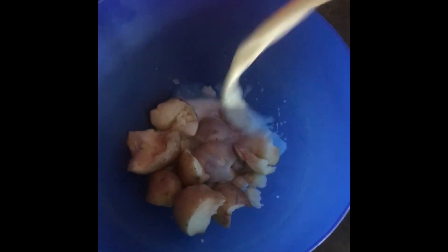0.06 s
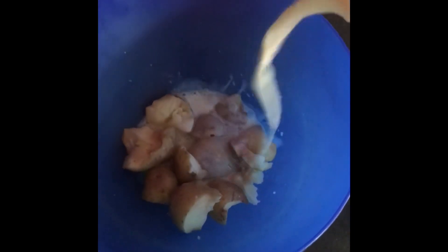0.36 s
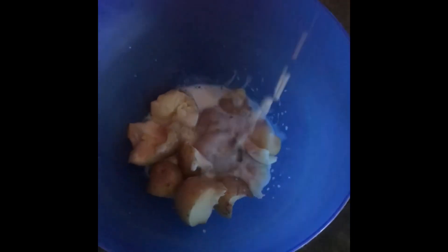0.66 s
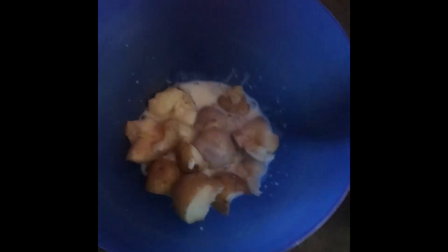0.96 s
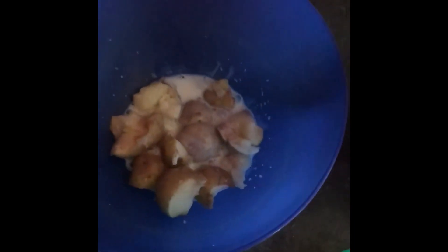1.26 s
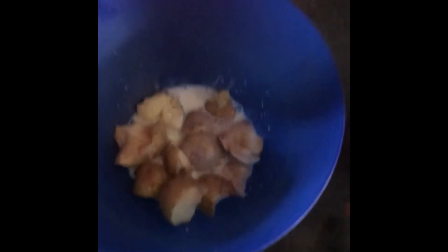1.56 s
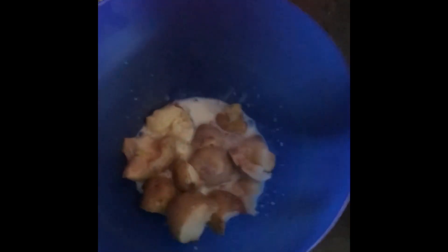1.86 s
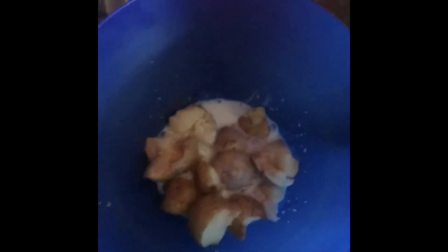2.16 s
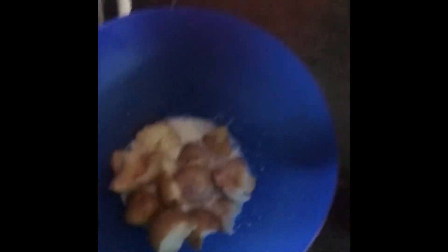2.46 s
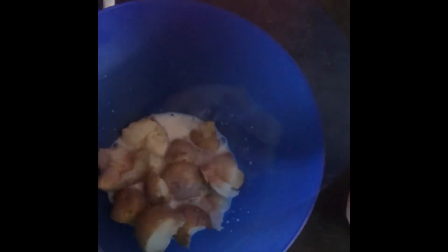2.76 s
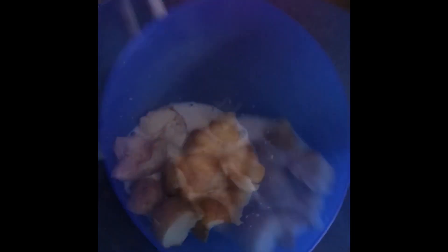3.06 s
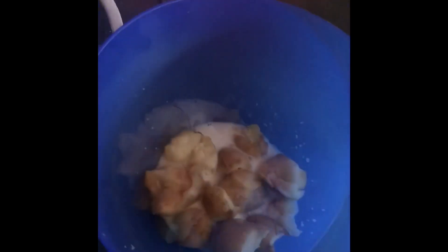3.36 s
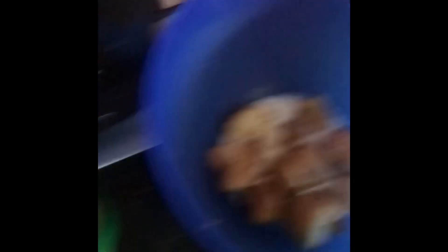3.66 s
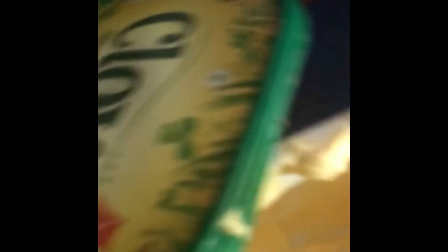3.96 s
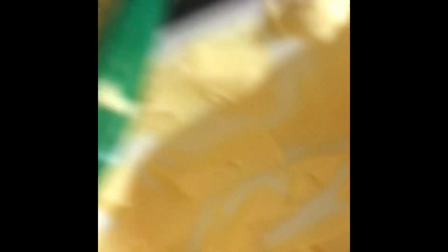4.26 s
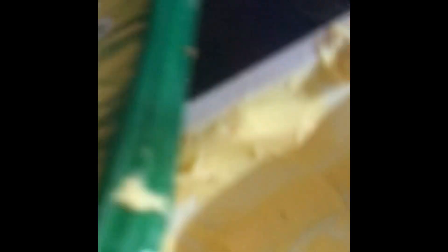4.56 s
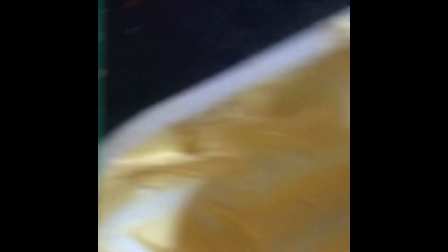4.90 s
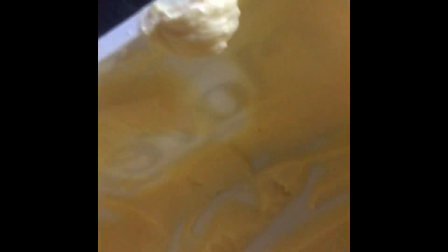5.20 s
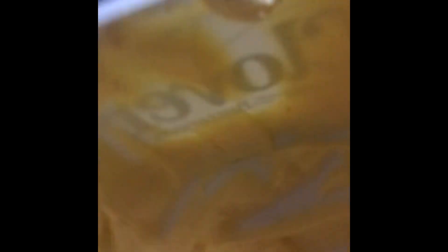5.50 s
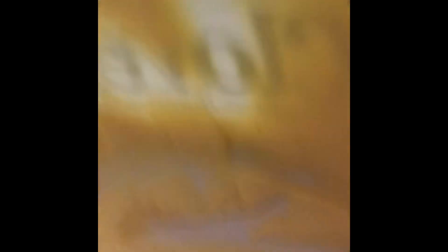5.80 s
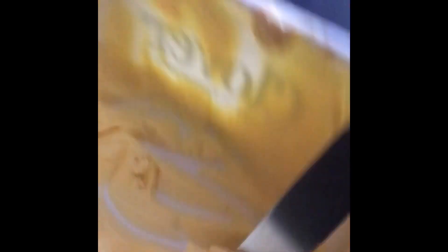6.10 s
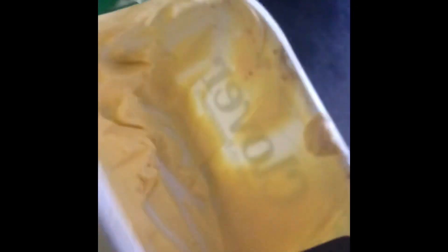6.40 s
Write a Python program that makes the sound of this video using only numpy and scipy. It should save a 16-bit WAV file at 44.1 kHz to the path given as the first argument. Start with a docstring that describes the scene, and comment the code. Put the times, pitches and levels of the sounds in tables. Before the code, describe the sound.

Milk trickles softly onto potatoes in a plastic bowl, with small splats and bubbly pings. The pour ends with a clack, and the jug lands loudly on the counter and rocks. A few utensils clack and slide. Then, close to the microphone, a table knife scrapes through butter in short strokes, bumping the thin plastic tub, with a loud hollow knock near the end. The small kitchen has a short ring and faint background noise.

```python
"""Milk trickles onto potatoes in a plastic bowl: drops splat, tiny bubbles ping.
The jug knocks, is set down and rocks; the kitchen counter booms under it. Utensils clack and slide.
Close by, a table knife scrapes through butter in stick-slip. Thin plastic, bowl or tub, is bumped.
A small kitchen rings behind it all, over quiet background noise with faint rustle and rumble."""
import sys
import numpy as np
from scipy import signal
from scipy.fft import rfft, irfft
from scipy.io import wavfile
from scipy.ndimage import uniform_filter1d, map_coordinates

SR = 44100
rng = np.random.default_rng(int(sys.argv[2]) if len(sys.argv) > 2 else 0)


def materialize(psi):
    """Save the field psi as 16-bit PCM at rate SR to the path in sys.argv[1].

    A 1-D psi becomes a single channel; in a 2-D psi each row is a channel.
    """
    bounded = np.clip(np.atleast_2d(psi).T, -1, 1)
    quanta = np.round(bounded * 32767).astype(np.int16)
    wavfile.write(sys.argv[1], SR, quanta)


N = 284004
TIME_S = np.arange(N) / SR
AGE_S = TIME_S[:SR // 2]  # time since an onset

# loudest milk drops (time [s], peak [dB], pitch [Hz])
DROPS = [(.0354, -26.5, 10740), (0.2011, -30, 6300), (0.214, -27, 6600), (0.2228, -30, 6760),
         (0.24, -36, 7100), (0.2645, -27, 5600), (0.287, -32, 3750), (0.3299, -36, 2800),
         (0.46, -38.5, 10000), (0.5285, -39.5, 2750), (.567, -35.5, 5100), (0.624, -27, 9500),
         (0.756, -33.5, 2500), (.767, -38.5, 9350), (0.7934, -36, 5050), (0.8376, -34.5, 7200)]
# milk gushes (time [s], length [s], rise [s], level [dB])
GUSHES = [(0.192, 0.1, 0.12, -39.5), (0.327, 0.031, .015, -53), (0.552, 0.073, .03, -55.5),
          (0.722, 0.092, 0.027, -54)]
# milk patter (frequency [Hz], gain [dB])
PATTER_EQ = [(300, -24.5), (650, 9), (1500, 3), (3000, 4.5), (6000, 1.5), (9000, -3.5), (13000, -10.5),
             (16000, -17)]
# jug landing and rocking (time [s], peak [dB], bass [dB], mid [dB], treble [dB], tick [dB], contact [s])
THUMPS = [(1.063, -17.5, -4, -5, 3, 8.5, 0.0045), (1.068, -8.5, -3, -3, -12.5, -16, 0.011),
          (1.107, -8, -16.5, 1.5, 6, -6, 0.0048), (1.116, -14, -1, 1.5, -11, -5, 0.0084),
          (1.146, -13.5, 8.5, 5, -19.5, -19, 0.0098), (1.205, -19.5, 0, -2, -5.5, 0, 0.016),
          (1.267, -19.5, -1, -2, 0, 6.5, 0.0063)]
# jug shell (frequency [Hz], gain [dB])
JUG_EQ = [(25, -32), (50, -12.5), (150, -15), (210, -10), (310, -4), (420, -14), (630, -19), (800, -13.5),
          (1550, -19), (1980, -16.5), (2600, -22.5), (4300, -22), (7700, -34.5), (16000, -51)]
# counter boom (frequency [Hz], level [dB], t60 [s])
COUNTER_MODES = [(45.8, 3.5, .38), (117, -7.5, 0.49), (210.2, -6.5, 0.9), (241, -3.5, 0.42),
                 (309, 1.5, 0.47), (307.5, -2.5, 0.33), (358.7, -13, 0.351), (382, -8.5, .35),
                 (445.4, -8.5, 0.48), (535, -9.5, 0.64), (770, -7.5, 0.26), (818, -5, 0.22),
                 (1050, -18, 0.34), (1400, -16.5, 0.25), (1860, -9.5, 0.11)]
# jug and utensil clacks (time [s], peak [dB], bass [dB], treble [dB], tick [dB], contact [s], send [dB])
CLACKS = [(.9250, -10.5, -3.5, 3.5, -3, 0.0025, -12), (2.3746, -22.5, 5.5, -8, -7, 0.0036, -10),
          (2.4881, -19, 7, -5, -10, 0.0039, -11.5), (2.618, -28, 10.5, -0.5, -25, 0.016, -9),
          (2.831, -32.5, 12.5, 0, 3, 0.0049, -18), (3.0474, -38, 13, -2, -7, 0.0019, -9),
          (3.148, -23.5, 3.5, -0.5, 9.5, 0.0031, -10), (3.319, -46.5, 12, 4, 11, .0035, -1.5)]
# utensil ring (frequency [Hz], width [Hz], gain [dB])
UTENSIL_PEAKS = [(1150, 130, -2), (1957, 305, 4), (2990, 590, 3), (4280, 200, -3.5), (5100, 300, -9.5),
                 (6150, 1100, -5), (7100, 300, -20)]
# dull body of a clack (frequency [Hz], gain [dB])
CLACK_EQ = [(60, -5), (150, -11), (330, -8), (520, -9), (780, 2), (1300, -4.5), (2000, -1.5), (3100, -3),
            (4400, -7.5), (7000, -17), (9000, -17.5), (16000, -28)]
# bumps on thin plastic, bowl or tub (time [s], peak [dB], flex [dB], wall [dB], tick [dB], pitch [ratio])
BUMPS = [(1.747, -32.5, -2.5, -12, -1, 1.26), (1.753, -28, 3.5, -18, 2, 0.89),
         (3.84, -37, 2.5, -20, -28, 0.87), (3.931, -40, 6, -7, -16, 0.72),
         (3.9814, -22.5, -0.5, -2, 7.5, 1.06), (4.021, -34.5, -8, -10, 2, 1.1),
         (4.189, -31.5, 9, -14, -11, 0.85), (5.321, -27.5, -2, 0.5, -5.5, 0.98),
         (5.622, -21.5, 7, -3.5, -16, 0.9), (5.711, -31.5, 7, 4, 1, 1.23), (5.748, -25, 6.5, 7, -24, 1),
         (5.8593, -9.5, 3, -16, -36, 0.6), (5.8859, -9.5, -11, 11, 5, 1.07),
         (5.918, -19.5, -7.5, -11.5, 13.5, 0.93), (5.945, -20, -2.5, 3, -14, 0.83),
         (5.961, -25.5, -6, -10, 17, 1.19), (5.971, -23.5, 4, 3, -6, 1.13),
         (5.984, -27, -19, -17, 13, 0.95), (6.049, -24, -29, -20.5, -27, 1.09),
         (6.1362, -22.5, -7.5, -9, -8, 1.075)]
# thin plastic walls (frequency [Hz], level [dB], t60 [s])
PLASTIC_MODES = [(65, -27, 0.045), (145, 1, 0.11), (251, 2, 0.083), (415, -1.5, 0.066), (753, 9, 0.025),
                 (848, 6.5, 0.013), (1150, 7, 0.0039), (1510, 2, 0.014), (2750, -9, 0.016),
                 (3200, -4.5, 0.0089), (3780, -10, 0.012), (4600, -29, 0.004), (4760, -9.5, 0.0047),
                 (7200, -22, 0.016), (11300, -49, 0.0036)]
# knife strokes (time [s], length [s], rise [s], scrape [dB], drag [dB], smear [dB])
STROKES = [(3.846, 0.095, 0.023, -61.5, -68.5, -70), (3.988, 0.066, .01, -57, -44.5, -85),
           (4.083, 0.094, 0.043, -57, -45, -78), (4.152, 0.1, 0.016, -38, -39.5, -52.5),
           (4.249, 0.059, 0.031, -43.5, -43, -58.5), (4.649, 0.14, 0.087, -41.5, -43, -57),
           (4.791, 0.22, 0.036, -55.5, -48, -70), (5.007, 0.14, 0.078, -50, -50.5, -63),
           (5.19, 0.15, 0.032, -62, -56.5, -69), (5.289, 0.28, 0.18, -50, -50, -60),
           (5.56, .1, 0.053, -38, -41.5, -51.5), (5.683, 0.11, 0.057, -42.5, -41.5, -72),
           (5.773, 0.082, 0.042, -29, -37.5, -50), (5.911, 0.12, 0.0055, -44, -39.5, -63),
           (6.049, 0.32, 0.057, -59, -48, -83), (6.312, 0.21, 0.11, -44, -48.5, -60)]
# tub wall under the blade (frequency [Hz], width [Hz], gain [dB])
WALL_PEAKS = [(2630, 194, 4.5), (3280, 31, 2.5), (3630, 150, 1), (4310, 104, 1.5), (5180, 360, -4),
              (6000, 650, -6.5), (7090, 78, -4.5), (8270, 230, -9.5), (9130, 450, -13.5), (11900, 480, -22),
              (13900, 500, -27)]
# blade edge (frequency [Hz], gain [dB])
SCRAPE_EQ = [(900, -44), (1500, 0), (2200, -8.5), (2800, 13), (4400, 7), (6000, 4), (8000, -17.5),
             (11000, -4.5), (16000, -7.5)]
# hollow drag on the tub (frequency [Hz], gain [dB])
DRAG_EQ = [(35, -3.5), (140, 1), (300, 0), (560, -3.5), (860, 2), (1250, -7), (1650, -6), (2050, -10),
           (3000, -57)]
# rubbing squeaks (time [s], length [s], pitch [Hz], nominal width [Hz], level [dB])
SQUEAKS = [(1.696, 0.075, 1110, 221, -51), (1.698, 0.038, 1350, 89, -47.5), (1.86, 0.043, 2600, 305, -54),
           (4.649, 0.16, 1510, 447, -43.5), (4.717, 0.042, 3380, 260, -43), (4.867, 0.16, 3080, 404, -51),
           (5.05, 0.12, 3180, 450, -48.5), (5.996, 0.022, 3970, 920, -33), (6.36, 0.089, 3500, 298, -43),
           (6.366, 0.095, 4270, 300, -43), (6.342, 0.057, 307, 25, -45)]
# slides over the counter, and faint swells of background rustle and rumble
# (time [s], length [s], rasp [dB], rumble [dB], rasp centre [Hz])
SLIDES_AND_RUSTLES = [(0.809, 0.31, -47.5, -54.5, 2400), (1.355, 0.44, -72.5, -59.5, 1537),
                      (1.618, .33, -57.5, -57, 1220), (1.894, 0.28, -67, -60.5, 1202),
                      (2.364, 0.085, -61, -48.5, 1300), (2.434, 0.098, -41, -50, 1800),
                      (2.558, 0.14, -45, -43.5, 1870), (2.715, .15, -46.5, -49.5, 970),
                      (2.972, 0.15, -54.5, -59, 1150), (3.113, .09, -47.5, -50, 1400),
                      (3.339, .13, -52.5, -62, 1190)]
# rasp and rustle (frequency [Hz], gain [dB])
RASP_EQ = [(100, -2), (300, -3), (500, -6), (790, 3.5), (1500, -7), (2900, -8), (4800, -17.5), (7700, -22),
           (16000, -30.5)]
# kitchen reverberation (frequency [Hz], t60 [s])
KITCHEN_DECAY = [(60, 0.58), (250, 0.48), (1000, 0.4), (3000, 0.42), (7000, 0.47), (15000, 0.36)]
# background noise (frequency [Hz], gain [dB])
BACKGROUND_EQ = [(20, -3.5), (55, -4), (90, -5), (150, -5.5), (230, -14), (430, -15), (600, -19.5),
                 (1600, -25.5), (2200, -26.5), (5900, -33.5), (16000, -42)]

POUR_S, TRICKLE_DB, FLOW_RELEASE_S = .88, -62.5, .0078
DRIP_COUNT, DRIP_MAX_DB, DRIP_RANGE_DB, DRIP_LOW_HZ, DRIP_HIGH_HZ = 20, -43.5, 5, 2400, 13000
YIELD_DB, LIFT_OFF_S = 4.5, .011  # butter yields, blade lifts
STICK_PER_S, STICK_DB = 41, 2.5  # butter grabs and lets go
BACKGROUND_DB, LOW_CUT_HZ, HIGH_CUT_HZ = -58.5, 38, 16000


def milk():
    """Drops and bubbles ping over the patter of a trickle that gushes now and then."""
    flow = undb(TRICKLE_DB) * np.exp(-np.maximum(TIME_S - POUR_S, 0) / FLOW_RELEASE_S)
    for at_s, length_s, rise_s, db in GUSHES:
        flow += undb(db) * push(at_s, length_s, rise_s, sag_db=0, release_s=FLOW_RELEASE_S)
    bubbles = fizz()
    patter = grains(per_s=4000, spread_db=5) * waver(per_s=170, depth_db=4.5)  # stream breaks into spurts
    out = flow * (undb(-3) * bubbles + undb(-4) * unit(colour(patter, PATTER_EQ)))
    for at_s, db, hz in DROPS:
        add(out, at_s, undb(db) * drop(hz))
    for slot, (offset, pitch, size) in enumerate(rng.random((DRIP_COUNT, 3))):
        hz = DRIP_LOW_HZ * (DRIP_HIGH_HZ / DRIP_LOW_HZ) ** pitch
        db = DRIP_MAX_DB - DRIP_RANGE_DB * (1 - size)
        add(out, (slot + offset) / DRIP_COUNT * POUR_S, undb(db) * drop(hz))
    return out


def drop(hz):
    """A tiny splat and the ping of its bubble."""
    splat = colour(chatter(contact_s=.0005), [(hz / 8, -20), (hz / 2, -11), (hz, 0), (hz * 2, -14)])
    bubble = ring([(hz, 0, .007)]) * (1 - np.exp(-AGE_S * hz))
    return crest(crest(splat) + bubble)


def fizz(count=520):
    """Tiny bubbles ring for some ten cycles, rising in pitch as they near the surface."""
    out, age_s = np.zeros(N), TIME_S[:400]
    for when, pitch, faintness in rng.random((count, 3)):
        hz = 2800 * 4.8 ** pitch
        ping = np.sin(2 * np.pi * hz * age_s * (1 + 12 * age_s)) * np.exp(-hz * age_s / 5)
        add(out, when * POUR_S, undb(-22 * faintness) * ping)
    return out / np.std(out[TIME_S < POUR_S])


def jug():
    """The jug lands, slaps down and rocks; the counter booms under it."""
    out, boom = np.zeros(N), unit(ring(COUNTER_MODES))
    shell_decay = [(60, .53), (300, .17), (900, .19), (2500, .044), (10000, .01)]
    for at_s, db, bass_db, mid_db, treble_db, tick_db, contact_s in THUMPS:
        shell = unit(colour(diffuse(shell_decay), JUG_EQ))
        attack = 1 - np.exp(-AGE_S / (contact_s / 10))
        slap = unit(colour(chatter(contact_s), JUG_EQ))
        blow = (shell + undb(-5) * boom) * attack + undb(-5.5) * slap
        eq = [(300, bass_db), (800, mid_db), (2000, treble_db), (4500, treble_db), (9000, tick_db)]
        add(out, at_s, undb(db) * crest(colour(blow, eq)))
    return out


def clacks():
    """Hard contacts ring briefly, differently in each direction. Returns direct sound and room send."""
    direct, send = np.zeros(N), np.zeros(N)
    for at_s, db, bass_db, treble_db, tick_db, contact_s, send_db in CLACKS:
        eq = [(900, bass_db), (1900, .016), (5000, treble_db), (11000, tick_db)]
        for path_s in (0, .001, .005, .009, .014):
            force = chatter(contact_s)[:4096]
            ringing = unit(band(resonate(force, UTENSIL_PEAKS), 730, 8000))
            ring_db = .5 * (db + 14)  # harder blows ring more
            body = unit(colour(force, CLACK_EQ))
            clack = undb(db) * crest(colour(undb(ring_db) * ringing + undb(2) * body, eq))
            if path_s == 0:
                add(direct, at_s, clack)
            else:
                add(send, at_s + path_s, .5 * undb(send_db) * clack)
    return direct, send


def plastic_bumps():
    """Bumps on thin plastic, bowl or tub: a tick, the hollow wall note, then the slow flex."""
    out = np.zeros(N)
    for at_s, db, flex_db, wall_db, tick_db, ratio in BUMPS:
        # wall stiffness varies by spot
        modes = [(hz * ratio, mode_db, t60_s) for hz, mode_db, t60_s in PLASTIC_MODES]
        bump = crest(ring(modes, lag_s=.001025)) + undb(-30) * chatter(contact_s=.002)
        eq = [(260, flex_db), (700, wall_db), (1100, wall_db), (3000, tick_db), (9000, tick_db - .5)]
        add(out, at_s, undb(db) * crest(colour(bump, eq)))
    return out


def knife_scrapes():
    """Dense stick-slip of the blade rings the tub walls; the butter smears with a fine hiss."""
    slips = grains(per_s=4500, spread_db=4) * waver(per_s=160, depth_db=1.8)
    walls = band(resonate(slips, WALL_PEAKS), 2200, 17000, order=4)
    edge = unit(walls) + undb(-1) * unit(colour(slips, SCRAPE_EQ))
    # the blade bends the wall: resonances wander a few percent
    read_index = np.cumsum(waver(per_s=11, depth_db=.18))
    edge = unit(map_coordinates(edge, [read_index], mode="wrap"))
    hollow = unit(colour(slips, DRAG_EQ))
    hiss = unit(band(grains(per_s=3500, spread_db=5), 7500, 16000))
    out, grip = np.zeros(N), waver(STICK_PER_S, STICK_DB)
    for at_s, length_s, rise_s, scrape_db, drag_db, smear_db in STROKES:
        pressure = grip * push(at_s, length_s, rise_s, YIELD_DB, LIFT_OFF_S)
        out += pressure * (undb(scrape_db) * edge + undb(drag_db) * hollow + undb(smear_db) * hiss)
    return out


def squeaks():
    """Slipping locks onto one resonance of the plastic."""
    out = np.zeros(N)
    for at_s, length_s, hz, width_hz, db in SQUEAKS:
        peak = [(hz, 1.87 * width_hz, 0)]  # widened, as two passes narrow it
        friction = rng.standard_normal(len(AGE_S))
        squeak = unit(resonate(resonate(friction, peak), peak))
        add(out, at_s, undb(db) * swell(length_s) * squeak)
    return out


def slides_and_rustles():
    """Rasping slides over the counter, and faint swells of background rustle and rumble."""
    out = np.zeros(N)
    rumble = unit(band(rng.standard_normal(N), 55, 378))
    grit = colour(grains(per_s=6600, spread_db=6), RASP_EQ) * waver(per_s=80, depth_db=4.5)
    for at_s, length_s, rasp_db, rumble_db, hz in SLIDES_AND_RUSTLES:
        span = slice(int(at_s * SR), int(at_s * SR) + len(AGE_S))
        rasp = unit(colour(grit[span], [(hz / 3, -7), (hz, 0), (hz * 2, -4)]))
        add(out, at_s, swell(length_s) * (undb(rasp_db) * rasp + undb(rumble_db) * rumble[span]))
    return out


def kitchen(send):
    """Wall reflections merge into a short diffuse tail."""
    response = diffuse(KITCHEN_DECAY) * np.clip(AGE_S / .003, 0, 1)
    return signal.fftconvolve(send, response / np.linalg.norm(response))[:N]


def background():
    """Quiet, dark noise; its level wavers slightly."""
    noise = unit(colour(rng.standard_normal(N), BACKGROUND_EQ))
    return undb(BACKGROUND_DB) * noise * waver(per_s=6, depth_db=.5)


def ring(modes, lag_s=0):
    """Decaying (Hz, dB, t60) modes. Low bending waves are slower and arrive later; lag_s is at 1 kHz."""
    out = 0
    for hz, db, t60_s in modes:
        age_s = np.maximum(AGE_S - lag_s * np.sqrt(1000 / hz), 0)
        out += undb(db) * np.sin(2 * np.pi * hz * age_s) * undb(-60 * age_s / t60_s)
    return out


def diffuse(decays):
    """Countless overlapping modes: octave bands of noise dying at their (Hz, t60) rates."""
    out = 0
    for low_hz in 22 * 2. ** np.arange(10):
        t60_s = along(decays, low_hz * np.sqrt(2))
        out += band(rng.standard_normal(len(AGE_S)), low_hz, 2 * low_hz) * undb(-60 * AGE_S / t60_s)
    return out


def chatter(contact_s):
    """Contact force: builds, rattles briefly, settles."""
    age = AGE_S / contact_s
    return rng.choice([-1, 1], len(AGE_S)) * np.sqrt(age) * np.exp(-age)


def grains(per_s, spread_db):
    """Random tiny impulses of uneven size."""
    impulses = (rng.random(N) < per_s / SR) * rng.choice([-1, 1], N)
    return impulses * undb(spread_db * np.clip(rng.standard_normal(N), -2, 2))


def push(at_s, length_s, rise_s, sag_db, release_s):
    """Gain of one movement: builds, sags, dies quickly."""
    age_s = TIME_S - at_s
    sag = np.clip((age_s - rise_s) / max(length_s - rise_s, 1 / SR), 0, 1)
    release = np.exp(-np.maximum(age_s - length_s, 0) / release_s)
    return np.clip(age_s / rise_s, 0, 1) * undb(-sag_db * sag) * release


def swell(length_s):
    """Half-sine gain."""
    return np.sin(np.pi * np.minimum(AGE_S / length_s, 1))


def waver(per_s, depth_db):
    """Smooth random gain."""
    knots = rng.standard_normal(N // 10)
    return undb(depth_db * np.interp(TIME_S * per_s, np.arange(len(knots)), knots))


def resonate(x, peaks):
    """Parallel (Hz, width, dB) resonances."""
    return sum(undb(db) * signal.lfilter(*signal.iirpeak(hz, hz / width_hz, SR), x)
               for hz, width_hz, db in peaks)


def colour(x, points, size=4096):
    """Minimum-phase filter through (Hz, dB) points."""
    bins_hz = np.arange(size // 2 + 1) * SR / size
    cepstrum = irfft(np.log(undb(along(points, bins_hz))))
    cepstrum[1:size // 2] *= 2
    cepstrum[size // 2 + 1:] = 0
    return signal.fftconvolve(x, irfft(np.exp(rfft(cepstrum))))[:len(x)]


def band(x, low_hz, high_hz, order=2):
    """Band-pass."""
    sos = signal.butter(order, [low_hz, min(high_hz, SR / 2 - 1)], "band", fs=SR, output="sos")
    return signal.sosfilt(sos, x)


def along(points, hz):
    """Interpolate (Hz, value) points over log frequency."""
    knots_hz, values = np.transpose(points)
    return np.interp(np.log(np.maximum(hz, 1)), np.log(knots_hz), values)


def undb(db):
    """Decibels to gain."""
    return 10 ** (np.asarray(db) / 20)


def unit(x):
    """Scale to rms 1."""
    return x / np.sqrt(np.mean(x ** 2))


def crest(x):
    """Scale the loudest 2 ms to an amplitude of about 1."""
    return x / np.sqrt(2 * uniform_filter1d(x ** 2, size=88).max())


def add(out, at_s, x):
    """Mix x into out from at_s."""
    start = max(int(at_s * SR), 0)
    out[start:start + len(x)] += x[:N - start]


def scene():
    """Near and far sources share one small kitchen; mono."""
    clack, clack_send = clacks()
    pour, thump, rasp = milk(), jug(), slides_and_rustles()
    plastic = plastic_bumps() + knife_scrapes() + squeaks()
    send = clack_send + undb(-15.5) * pour + undb(-10.5) * thump + undb(-4.5) * rasp + undb(-17) * plastic
    return (pour + thump + clack + rasp + plastic + kitchen(send) + background())[None]


def record(dry):
    """The microphone rounds the loudest peaks and loses the deepest bass and the top."""
    rounded = np.tanh(1.3 * dry) / 1.3
    low_cut = signal.butter(5, LOW_CUT_HZ, "high", fs=SR, output="sos")
    high_cut = signal.ellip(8, .2, 70, HIGH_CUT_HZ, fs=SR, output="sos")
    return signal.sosfilt(high_cut, signal.sosfilt(low_cut, rounded))


dry = scene()
out = record(dry)
materialize(out)
```